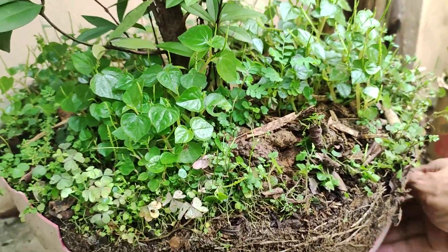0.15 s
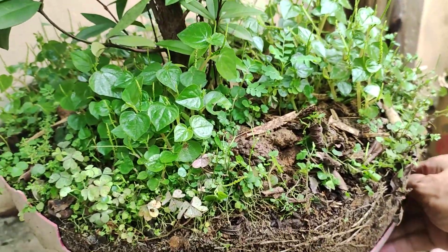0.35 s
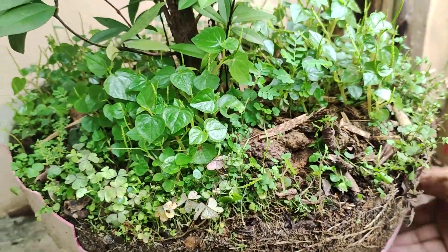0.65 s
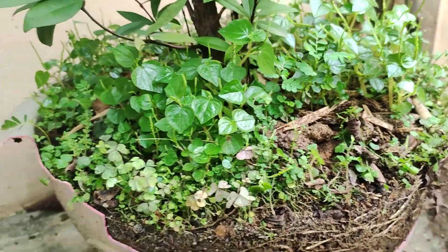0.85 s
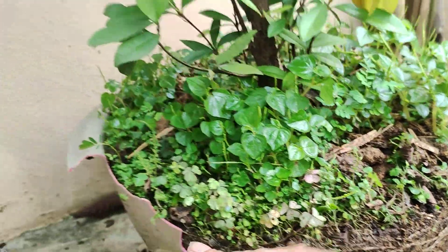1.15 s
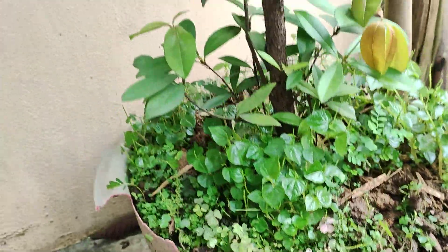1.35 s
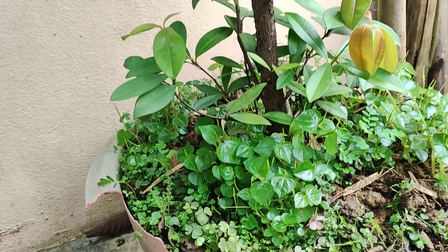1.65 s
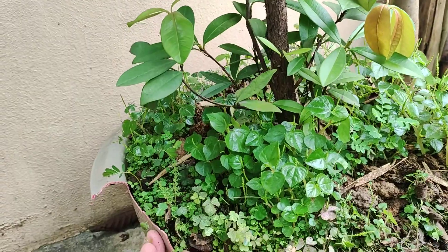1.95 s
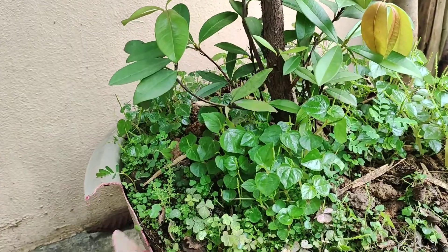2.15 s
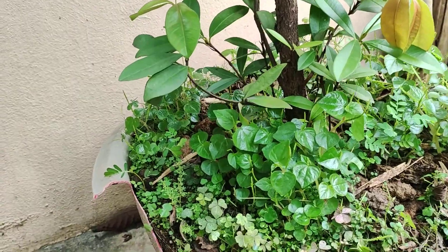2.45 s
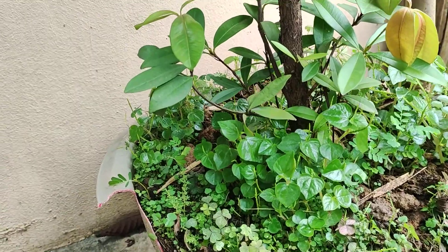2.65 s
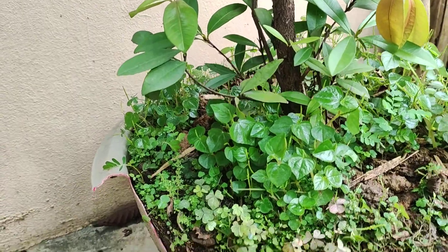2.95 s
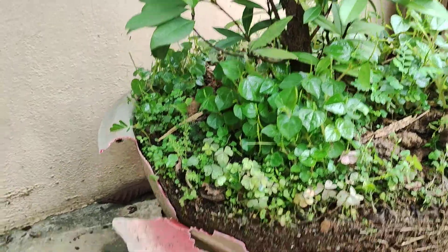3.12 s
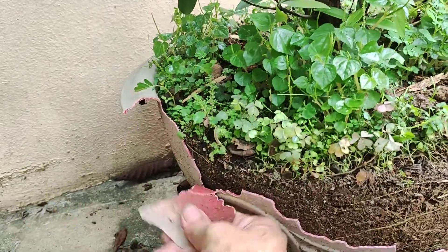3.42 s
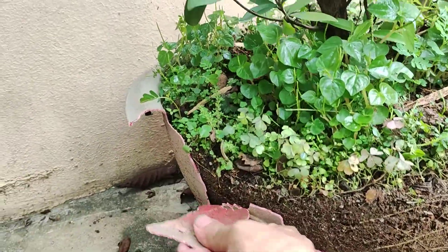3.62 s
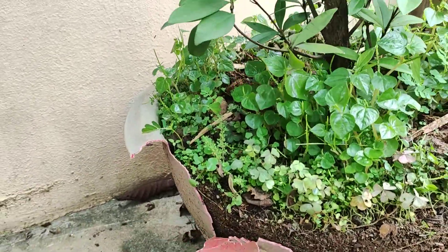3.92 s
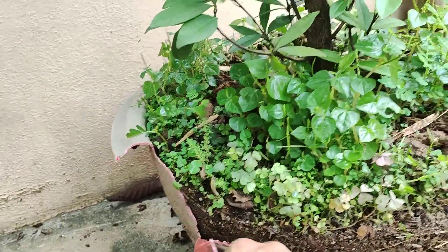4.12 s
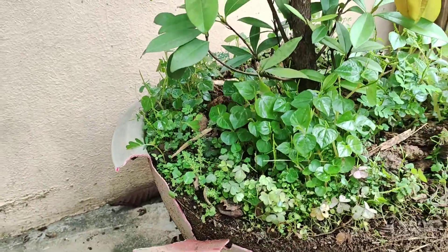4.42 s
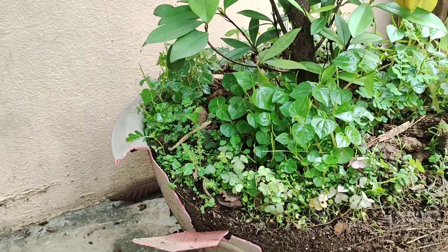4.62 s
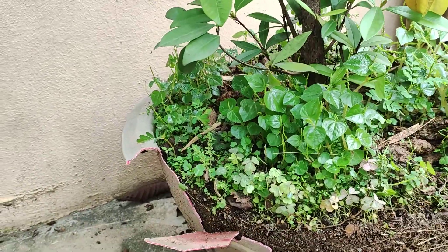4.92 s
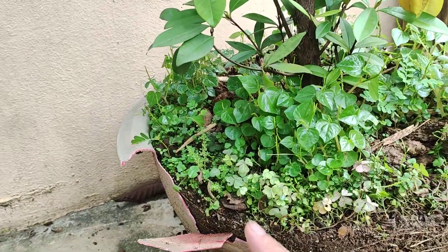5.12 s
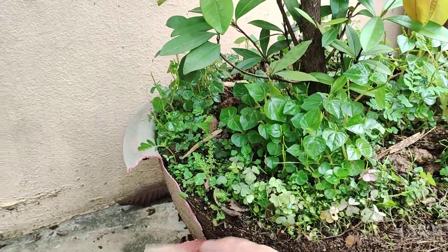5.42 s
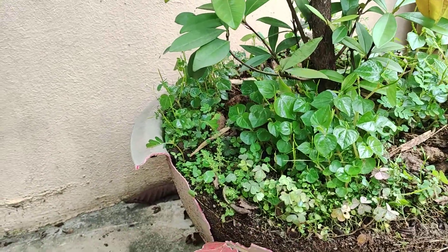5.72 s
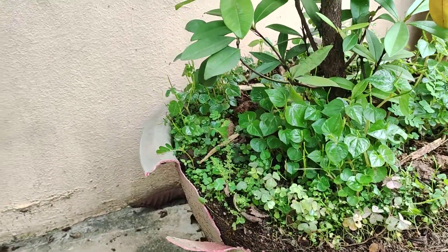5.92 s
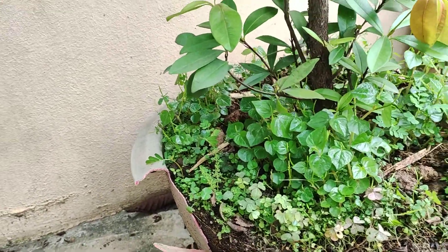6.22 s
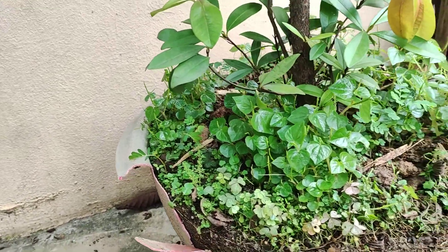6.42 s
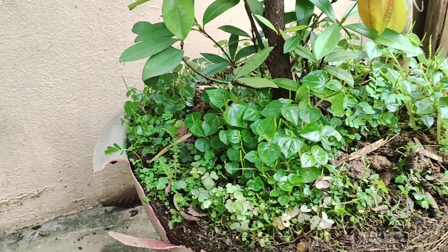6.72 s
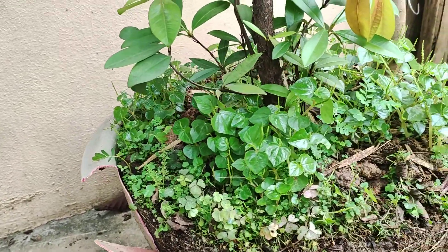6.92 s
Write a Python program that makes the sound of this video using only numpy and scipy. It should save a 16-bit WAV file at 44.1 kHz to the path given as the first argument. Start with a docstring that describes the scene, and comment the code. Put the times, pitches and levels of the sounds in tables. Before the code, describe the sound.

Hands break an old brittle plastic plant pot close to a stereo microphone outdoors. Light clicks come first, then a rapid burst of very loud dry cracks with a scrape, a pause, a rustling crackle run capped by a sharp snap, a long lull of faint rubbing, and a single huge snap. Soft traffic, crickets and small bird chips stay far below, with only a brief dull echo from wall and paving.

```python
"""Breaking an old plant pot

A hand pries the brittle wall off an old plastic plant pot in a walled yard. The wall snaps in short
running cracks, built from decaying tones and noise; fingers and roots rub along it as grit and hiss.
Crickets hiss in a narrow band, a small bird chips in bursts of buzz, a far bird whistles a wavering
near sine, and traffic rumbles as coloured noise with a far engine's hum."""
import sys
import numpy as np
from scipy import signal
from scipy.fft import rfft, irfft, next_fast_len
from scipy.io import wavfile
from scipy.ndimage import uniform_filter1d

SR = 44100
rng = np.random.default_rng(int(sys.argv[2]) if len(sys.argv) > 2 else 0)


def linear_from_db(decibels):
    """Turn decibels (scalar or array-like) into linear amplitude factors; 0 gives 1."""
    return 10 ** (np.asarray(decibels, float) / 20)


def wav_record(signal):
    """Record a signal, one row per channel, as 16-bit PCM in the file named by sys.argv[1]."""
    frames = np.transpose(np.atleast_2d(signal))
    bounded = np.clip(frames, -1, 1)
    # unit amplitude maps onto the largest positive 16-bit level
    quanta = np.round(bounded * 32767).astype(np.int16)
    wavfile.write(sys.argv[1], SR, quanta)


N = 311346  # length in samples

# traffic and air, loudness over pitch before YARD_DB sets the level: pitch_hz, density_db (per Hz)
YARD_COLOUR = [(15, -35.5), (25, -0.5), (50, 0.5), (92, -2), (144, -10), (193, -5.5), (346, -16.5),
               (529, -16.5), (747, -23.5), (1490, -29.5), (2890, -26.5), (4190, -35), (5600, -38),
               (8000, -36.5), (14200, -40.5)]
# how alike the yard noise is left and right: pitch_hz, likeness (0 to 1)
YARD_LIKENESS = [(60, .75), (150, 0.62), (380, 0.44), (950, 0.01)]
# far engine near 100 Hz: time_s, level_db
ENGINE_HUM = [(0, -71), (.3, -61.5), (.8, -60.5), (1.0, -71), (1.301, -70), (1.899, -80), (3.499, -80.5),
              (3.799, -63.5), (4.102, -80), (7.06, -78)]
# strokes of fingers and roots along the wall:
# peak_s, level_db, swell_ms, fade_ms, dull_db (against level_db), bright_db (against level_db)
RUB_STROKES = [(0.01, -56.5, 50, 125, 0, -10.5), (0.101, -62, 30, 120, -1, -14),
               (0.30, -62.5, 33, 14, -4, -14), (0.42, -63.5, 80, 86, -13, -15),
               (0.504, -68, 12, 780, -13, -10), (0.70, -64, 40, 270, -15, -14),
               (0.786, -48, 50, 32, -6, -17), (1.10, -69, 350, 140, -21, -7.5),
               (1.28, -66.5, 110, 370, -3.5, 2), (1.36, -59, 150, 330, -8.5, -6.5),
               (1.71, -60, 400, 150, -7.5, -6.5), (1.951, -56, 21, 560, -7.5, -5),
               (2.109, -48, 65, 4.9, -5, -8), (2.157, -20.5, 9, 33, 0.5, -6.5),
               (2.168, -18.5, 17, 13, -20, -5), (2.191, -39, 6, 89, -1.5, -7),
               (2.254, -46.5, 60, 57, 3.5, -11.5), (2.31, -65.5, 30, 840, 4, -2),
               (2.454, -61, 130, 230, -3, -4), (2.54, -63, 35, 6.5, 2, -5.5),
               (2.566, -41.5, 10, 56, 3, -14.5), (2.622, -48.5, 25, 11, -0.5, -26),
               (2.874, -66.5, 95, 49, 2, -0.5), (3.07, -70.5, 300, 220, 0, -3),
               (3.385, -62, 310, 100, -6, -5), (3.54, -86, 280, 180, -13, -8),
               (3.62, -69.5, 20, 360, 6, -28), (3.698, -69, 30, 12, -21, -1), (3.724, -56, 25, 12, -12, -4),
               (3.75, -29.5, 7, 62, -20, -9.5), (3.814, -50.5, 300, 18, -19, -18.5),
               (3.825, -44, 10, 21, -5, 4), (3.855, -47, 10, 68, -10, -1), (3.939, -56, 300, 10, -7, -16),
               (3.946, -43.5, 8, 8, -7, -19), (3.972, -59.5, 30, 22, -1, 2),
               (4.002, -55.5, 10, 120, -2.5, -1.5), (4.04, -57.5, 60, 56, -14, -1.5),
               (4.134, -70, 600, 740, -14, -10), (4.224, -81.5, 300, 13, 0, -17),
               (4.258, -50.5, 10, 160, 6, -10), (4.33, -51.5, 51, 62, 5, -11),
               (4.375, -42, 210, 29, -1.5, -11), (4.42, -63.5, 40, 1000, -10.5, -7),
               (4.554, -81, 300, 56, -19.5, 1), (4.726, -77.5, 54, 110, -7, -11),
               (4.81, -71, 28, 62, 14, -6), (4.941, -47.5, 45, 31, -16, -6.5),
               (5.038, -66.5, 50, 70, -10, -8), (5.168, -57.5, 19, 185, -9, -15),
               (5.435, -65, 220, 200, -21.5, -32), (5.536, -52.5, 180, 145, -4.5, -7),
               (5.672, -62.5, 120, 117, 1, -4), (5.814, -65.5, 35, 8.8, 7.5, 0.5),
               (5.868, -45.5, 27, 51, 8, -2), (5.91, -57.5, 20, 103, 5.5, -5.5),
               (6.058, -62, 46, 35, 1.5, 12), (6.12, -65.5, 40, 55, -13, -20),
               (6.185, -66, 25, 400, -6, -20.5), (6.275, -63, 73, 200, -12.5, -1),
               (6.35, -62, 170, 42, -13, 5), (6.538, -60, 120, 140, -15, -6.5),
               (6.668, -67, 300, 140, -4, -5), (6.748, -65.5, 36, 820, -23, -8),
               (6.984, -64, 47, 99, -14, -19.5), (7.055, -60, 23, 37, -5, -14)]
# tone of the rubbing, before each part is set to its own level: pitch_hz, density_db (per Hz)
RUB_TONE = [(200, 4), (535, 1.5), (830, 0.5), (1200, -5), (1800, -2), (2900, 0.5), (4500, -7.5),
            (6000, -8.5), (9000, -9.5), (14000, -10)]
# small bird: start_s, level_db (peak), pitch_hz
BIRD_CHIPS = [(0.4997, -51.5, 7500), (0.725, -53, 7360), (1.266, -53, 7000), (1.466, -54.5, 7300),
              (2.352, -53, 7250), (2.8975, -50.5, 7430), (4.593, -55, 7300), (5.3328, -55.5, 7560)]
# cracks: start_s, level_db, flex_db and fizz_db (against level_db; snaps() adds an offset to each),
# flex_hz and ring_hz (centres of the low and the high modes that are picked)
CRACKS = [(0.7606, -35.5, -5, -45, 580, 2110), (0.7672, -34, -12, -28, 568, 1780),
          (1.133, -44.5, -20, -31, 576, 2100), (1.3688, -44, -9, -13, 886, 2340),
          (1.4284, -38.5, -22, -6, 552, 3030), (1.5955, -42.5, -9.5, -14, 999, 1200),
          (1.946, -47, -13, -2, 308, 2050), (2.1138, 0.5, -20, -17.5, 573, 2860),
          (2.1298, 1.5, -20, -23, 600, 2600), (2.1437, -1, -16.5, -35, 940, 2600),
          (2.1649, -4.5, -57, -36, 339, 1400), (2.246, -27.5, -14, -16, 880, 2050),
          (2.4496, -42, -8, -5, 247, 2820), (2.5465, -5, -11, -21, 1000, 2440),
          (2.5992, -31.5, -7, -21, 330, 1640), (2.6177, -27, -36, -28, 660, 1822),
          (3.6206, -40.5, -24, -4.5, 466, 2273), (3.687, -23.5, -19.5, -21, 590, 2420),
          (3.7275, -22.5, -15.5, -17, 634, 2950), (3.7474, -33, -28, -17, 813, 3360),
          (3.7558, -17, -14.5, -5, 594, 2280), (3.8167, -25, -38, -8, 902, 3800),
          (3.8548, -32.5, -40, -13, 511, 3570), (3.9428, -44, -33, -16, 678, 2650),
          (3.9638, -24, -25, -12, 592, 2360), (4.0106, -19.5, -13.5, -22.5, 650, 2100),
          (4.0346, -38.5, -70, -18, 525, 3320), (4.2384, -5.5, -15, -16, 580, 2920),
          (4.5481, -42.5, -28, -10, 277, 3180), (4.8061, -44, -5, -22, 275, 1205),
          (4.8349, -54, -5, -9, 826, 1260), (5.5217, -38.5, -4, -24, 256, 2180),
          (5.8292, 2.5, -14.5, -16.5, 550, 2750), (6.4956, -43, -11.5, -23, 961, 1705),
          (6.5278, -41, -22, 1.5, 307, 3950), (6.635, -41.5, -17, -16.5, 600, 2260),
          (6.6601, -36, -17.5, -9.5, 999, 2020), (6.7, -55, -30, 1, 500, 3500),
          (6.7436, -49, -14, -3.5, 380, 2330), (6.7682, -47.5, -34, -4, 440, 2910),
          (6.8166, -43, -25, -10.5, 298, 2440)]
# modes (natural tones) of the pot wall: pitch_hz, weight_db (before each crack picks), t60_s (60 dB fade)
WALL_MODES = [(311, -0.5, 0.056), (346, -7, 0.098), (465, -12, 0.027), (539.5, 3, 0.025), (600, 6.5, 0.028),
              (692.3, -4, 0.054), (770, -4, .035), (820, 9.5, 0.018), (1316, -6, .02), (1400, -11, 0.014),
              (1650, -3, 0.0041), (1930, -4, 0.012), (2360, 3.5, 0.0093), (2360, -4.5, 0.0043),
              (2857, 0, 0.0091), (2983, -2.5, 0.012), (3350, -4, .014), (3740, -5, 0.0047),
              (4230, -3.5, 0.004), (4130, 4, .012), (5128, -2.5, 0.023), (5200, -1, 0.0076)]
# far bird, one table a phrase: time_s, pitch_hz, level_db (pitch and level waver around these)
WHISTLE_PHRASES = [
    [(2.92, 1095, -81), (3.02, 1110, -71), (3.15, 1180, -79.5), (3.2, 1140, -68), (3.23, 1058, -72.5),
     (3.36, 1107, -67), (3.44, 1120, -79.5), (3.55, 1168, -75.5), (3.64, 1050, -70)],
    [(4.42, 1600, -78), (4.5, 1575, -76.5), (4.68, 1555, -80), (4.75, 1600, -81)],
    [(6.27, 1690, -76.5), (6.31, 1655, -68.5), (6.43, 1664, -75), (6.5, 1650, -65), (6.62, 1637, -71.5),
     (6.65, 1620, -78.5)],
    [(6.7, 1628, -82), (6.83, 1605, -72), (6.96, 1650, -83)],
]

LEFT_LAG_S = 0.000098  # the pot sits nearer the right, so the left hears it late
LEFT_DB = -0.5         # the left channel against the right
YARD_DB = -61.5        # middle of the slowly drifting level


def rms_one(x):
    """Scales x to an average (rms) level of 1."""
    return x / np.sqrt(np.mean(x ** 2) + 1e-20)


def peak_one(x):
    """Scales x so that its highest peak is 1."""
    return x / (np.abs(x).max() + 1e-12)


def at_hz(points, hz):
    """Reads a table over pitch, with pitch on a log scale."""
    table_hz, value = np.array(points).T
    return np.interp(np.log(hz), np.log(table_hz), value)


def band(x, low_hz, high_hz, order=2):
    """Keeps the pitches between two edges."""
    return signal.sosfilt(signal.butter(order, [low_hz, high_hz], "band", fs=SR, output="sos"), x)


def coloured(x, spectrum):
    """Weighs the pitches of x by a table in dB; the last weight is held above 14 kHz."""
    size = next_fast_len(x.shape[-1])
    hz = np.clip(np.fft.rfftfreq(size, 1 / SR), 1, 14000)
    weighed = rfft(x, size) * linear_from_db(at_hz(spectrum, hz))
    return irfft(weighed, size)[..., :x.shape[-1]]


def drift(rate_hz):
    """Slow random wandering around 0 with a spread of 1."""
    r = np.exp(-80 * np.pi * rate_hz / SR)  # made at 1/40 of the sample rate
    slow = signal.lfilter([1], [1, -2 * r, r * r], rng.standard_normal(N // 40 + 2002))
    slow = rms_one(slow[2000:])  # skip the start-up of the filter
    return np.interp(np.arange(N) / 40, np.arange(len(slow)), slow)


def left_right(shared, own, alike):
    """Mixes a shared sound, late on the left, with a separate sound for each side."""
    i = np.arange(shared.shape[-1])
    late = np.interp(i - LEFT_LAG_S * SR, i, shared)
    return np.sqrt(alike) * np.array([late, shared]) + np.sqrt(1 - alike) * own


def traffic_and_air():
    """Coloured noise, most alike left and right in the bass: a middle part plus a side part."""
    mid, side = coloured(rng.standard_normal((2, N)), YARD_COLOUR)
    likeness = np.clip(YARD_LIKENESS, [1, 0], [SR, 0.99])
    side_db = [(hz, 10 * np.log10((1 - c) / (1 + c))) for hz, c in likeness]
    both = mid + coloured(side, side_db) * [[1], [-1]]
    return linear_from_db(YARD_DB + 0.14 * drift(6)) / np.std(mid) * both


def far_engine():
    """A hum made of noise in a very narrow low band, the same on both sides."""
    level_db = np.interp(np.arange(N) / SR, *np.transpose(ENGINE_HUM))
    return linear_from_db(level_db) * rms_one(band(rng.standard_normal(N), 96, 105))


def crickets():
    """Many crickets blend into a narrow hiss whose level flickers."""
    centre_hz, width_hz, level_db = 4652, 170, -66.5
    noise = rng.standard_normal((2, N))
    hiss = rms_one(band(noise, centre_hz - width_hz / 2, centre_hz + width_hz / 2))
    return hiss * linear_from_db(level_db + 2.7 * drift(60))


def yard():
    """The steady background adds up traffic and air, a far engine and crickets."""
    return traffic_and_air() + far_engine() + crickets()


def stroke_gains():
    """Each stroke swells to its peak and fades; strokes add as power in the dull, middle and bright parts."""
    t = np.arange(0, N + 32, 32)[:, None] / SR
    peak_s, level_db, swell_ms, fade_ms, dull_db, bright_db = np.transpose(RUB_STROKES)
    time_ms = np.maximum(np.where(t < peak_s, swell_ms, fade_ms), 1)
    stroke_db = level_db - 20 * np.abs(t - peak_s) * 1000 / time_ms  # 20 dB in one swell or fade time
    gains = []
    for part_db in (dull_db, 0, bright_db):
        total = np.sqrt(np.sum(linear_from_db(stroke_db + part_db) ** 2, axis=1))
        gains.append(np.interp(np.arange(N) / SR, t[:, 0], total))
    return gains


def rub():
    """Rubbing gives dense grit clicks over a smooth hiss, in a dull, a middle and a bright part."""
    clicks_per_s, click_db, hiss_level = 3000, 3.5, 0.9
    dull_gain, middle_gain, bright_gain = stroke_gains()
    hits = rng.random((3, N)) < clicks_per_s * linear_from_db(2.5 * drift(40)) / SR
    strength = linear_from_db(click_db * np.minimum(rng.exponential(1, (3, N)), 3.5))
    clicks = hits * strength * rng.choice([-1, 1], (3, N))
    grit = rms_one(clicks) + hiss_level * rng.standard_normal((3, N))
    dull = coloured(left_right(grit[0], grit[1:], alike=0.7), RUB_TONE)
    rest = coloured(left_right(grit[0], grit[1:], alike=0.13), RUB_TONE)
    # the middle part is turned over so that neighbours add at their common edges
    parts = [(dull, 270, 1000, dull_gain), (-rest, 1000, 5300, middle_gain),
             (rest, 5300, 17000, bright_gain)]
    return sum(gain * rms_one(band(x, low_hz, high_hz)) for x, low_hz, high_hz, gain in parts)


def chips():
    """Each chip is a buzzy high note, made of band noise, that starts hard and dies in the yard."""
    length_s, width_hz = 0.053, 900
    t, out = np.arange(7000) / SR, np.zeros((2, N + 7000))
    shape = np.minimum(t / 0.0017, 1) * np.exp(-(t / length_s) ** 2)
    for start_s, level_db, pitch_hz in BIRD_CHIPS:
        noise = rng.standard_normal((2, len(t)))
        buzz = band(noise, pitch_hz - width_hz / 2, pitch_hz + width_hz / 2)
        i = round(start_s * SR)
        out[:, i:i + len(t)] += linear_from_db(level_db) * peak_one(buzz * shape)
    return out[:, :N]


def crack_run(t):
    """A crack creeps with growing noise before time 0, then runs in a short burst and dies away."""
    run_s, creep = 0.002, linear_from_db(-20)  # the burst peaks after half of run_s
    after = np.maximum(t, 0)
    burst = after / run_s * np.exp(1 - 2 * after / run_s)
    return np.where(t < 0, creep * np.exp(t / 0.0011), burst + creep * np.exp(-after / run_s))


def mode_gains(level_db, flex_hz, ring_hz):
    """Where the wall breaks picks its modes; harder cracks swing the deepest modes more."""
    hz, weight_db, _ = np.array(WALL_MODES).T[:, :, None]
    low = hz < 1100
    width_octaves = np.where(low, 0.28, 0.33)
    apart = np.log2(hz / np.where(low, flex_hz, ring_hz)) / width_octaves
    picked = linear_from_db(weight_db) * (np.exp(-0.5 * apart ** 2) + 0.29)
    return picked * linear_from_db(0.96 * (level_db + 12.5) * np.log2(575 / np.minimum(hz, 575)))


def crack_ring(t, run, gains):
    """The running crack reaches the high modes one by one, and bare tearing noise joins them."""
    creep_s, spread_s, bare_db = 0.000802, 0.0014, -6
    hz, _, t60_s = np.array(WALL_MODES).T[:, :, None]
    chance = rng.random((3, len(hz), 1))
    lag_s = np.array([LEFT_LAG_S, 0])[:, None, None]
    reached_s = creep_s + chance[0] ** 2 * spread_s + lag_s + 0.00014 * chance[1:]
    since = np.maximum(t - reached_s, 0)
    tones = np.sin(2 * np.pi * hz * since) * linear_from_db(-60 * since / t60_s)
    ring = np.sum(gains * (hz >= 1100) * tones, axis=1)
    noise = rng.standard_normal((3, len(t)))
    bare = band(left_right(noise[0], noise[1:], alike=0.56) * run, 500, 5000)
    return linear_from_db(-27) * (rms_one(ring) + linear_from_db(bare_db) * rms_one(bare))


def crack_flex(t, gains):
    """The freed wall flexes back: a short smooth push sets the low modes swinging."""
    flex_lag_s, push_s, swell_cycles, tilt_db = 0.002387, 0.00089, 0.24, 3.5
    hz, _, t60_s = np.array(WALL_MODES).T[:, :, None]
    after = np.maximum(t, 0)
    swing = np.sin(2 * np.pi * hz * after) * linear_from_db(-60 * after / t60_s)
    swing = swing * (1 - np.exp(-hz * after / swell_cycles))
    start = np.argmax(t >= 0)
    push = np.exp(-((t[start:start + 400] - flex_lag_s) / push_s * 4) ** 2)[None]
    # neighbouring modes face different sides
    facing_db = tilt_db * (-1.) ** np.arange(len(hz)) * [[1], [-1]]
    low_modes = (gains * (hz < 1100)).T * linear_from_db(facing_db) @ swing
    return peak_one(signal.fftconvolve(push, low_modes, axes=1)[:, :len(t)])


def crack_fizz(t, run):
    """Bright noise follows the run of the crack and leaves a short fading tail."""
    run_s, t60_s = 0.002, 0.032
    after = np.maximum(t, 0)
    noise = rng.standard_normal((3, len(t)))
    fizz = band(left_right(noise[0], noise[1:], alike=0.14), 3100, 22000)
    tail = np.minimum(after / run_s, 1) * linear_from_db(-60 * after / t60_s)
    return peak_one(fizz * (0.5 * run + tail))


def snaps():
    """Each crack adds ringing high modes, a flex on the low modes and fizz; paving sends it back once."""
    flex_offset_db, fizz_offset_db = 6.5, 6
    bounce_s, bounce_db = 0.0035, -6
    size, lead = 6000, 130  # samples in one crack, and before its time 0
    t, out = (np.arange(size) - lead) / SR, np.zeros((2, N + size))
    run = crack_run(t)
    for start_s, level_db, flex_db, fizz_db, flex_hz, ring_hz in CRACKS:
        gains = mode_gains(level_db, flex_hz, ring_hz)
        crack = crack_ring(t, run, gains)
        crack = crack + linear_from_db(flex_db + flex_offset_db) * crack_flex(t, gains)
        crack = crack + linear_from_db(fizz_db + fizz_offset_db) * crack_fizz(t, run)
        i = round(start_s * SR) - lead
        out[:, i:i + size] += linear_from_db(level_db) * crack
    # the cracks carry no deep bass
    out = signal.sosfilt(signal.butter(4, 215, "high", fs=SR, output="sos"), out)
    bounce = np.pad(out, ((0, 0), (round(bounce_s * SR), 0)))[:, :N]
    return out[:, :N] + linear_from_db(bounce_db) * band(bounce, 1600, 7500, order=1)


def echoes(x):
    """Wall and paving send back a short dull wash of fading noise, different on each side."""
    t60_s = 0.082
    t = np.arange(12000) / SR
    noise = band(rng.standard_normal((2, len(t))), 200, 7000, order=1)
    wash = noise * linear_from_db(-60 * t / t60_s) * (t > 0.004)
    return signal.fftconvolve(x, wash / np.sqrt(np.sum(wash ** 2) / 2), axes=1)[:, :N]


def whistle():
    """A near sine that wavers on its way through the air, differently on each side."""
    t, rows = np.arange(N) / SR, np.concatenate(WHISTLE_PHRASES)
    inside = sum((t >= phrase[0][0]) & (t <= phrase[-1][0]) for phrase in WHISTLE_PHRASES) > 0
    inside = uniform_filter1d(inside * 1., size=130)  # soft edges
    pitch_hz = np.interp(t, rows[:, 0], rows[:, 1])
    level_db = np.interp(t, rows[:, 0], rows[:, 2])
    phase = 2 * np.pi * np.cumsum(pitch_hz * (1 + 0.00437 * drift(19))) / SR
    sides = np.array([linear_from_db(0.99 * drift(2.3)) * np.sin(phase + turn) for turn in (0, 1.4)])
    return inside * linear_from_db(level_db) * sides * np.sqrt(2)


def scene():
    """Adds up all sounds; the cracks alone feed the echoes, and the right side is a touch louder."""
    echo_db = -21
    cracks = snaps()
    pot = rub() + cracks + linear_from_db(echo_db) * echoes(cracks)
    return linear_from_db([[LEFT_DB / 2], [-LEFT_DB / 2]]) * (yard() + pot + chips() + whistle())


def roll_off(x):
    """The treble ends steeply here."""
    return signal.sosfilt(signal.butter(12, 16380, fs=SR, output="sos"), x)


def record(dry):
    """The top of the range is cut steeply, so only the loudest cracks show there; high peaks are rounded."""
    cut = signal.sosfilt(signal.ellip(6, 1, 24, 14350, fs=SR, output="sos"), dry)
    cut = signal.sosfilt(signal.butter(4, 15600, fs=SR, output="sos"), cut)
    over = np.maximum(np.abs(cut) - 0.6, 0)  # rounding begins at 0.6 of full scale
    rounded = cut - np.sign(cut) * (over - 0.33 * np.tanh(over / 0.33))
    return roll_off(rounded)


dry = scene()
out = record(dry)
wav_record(out)
```